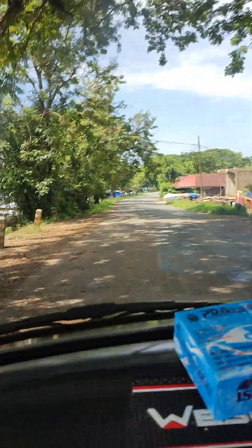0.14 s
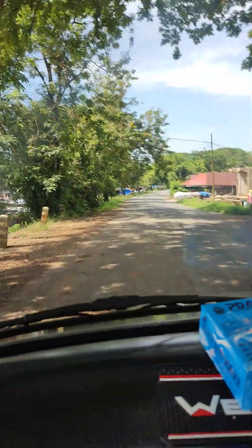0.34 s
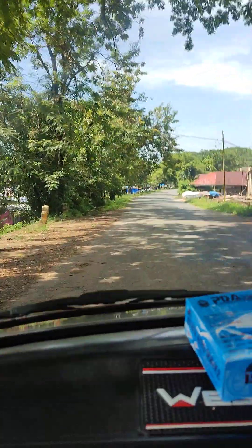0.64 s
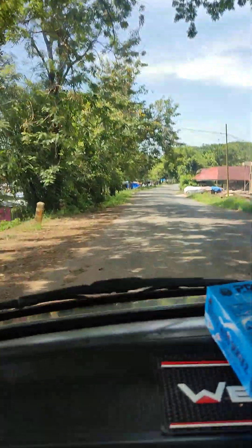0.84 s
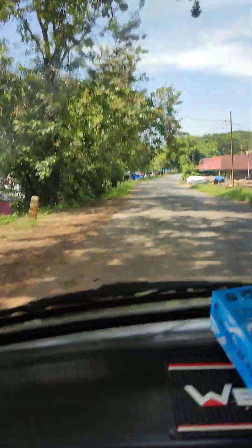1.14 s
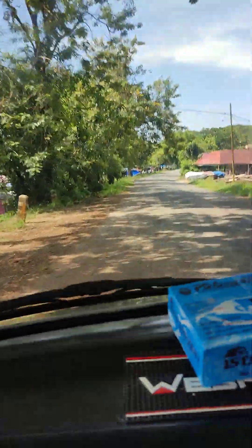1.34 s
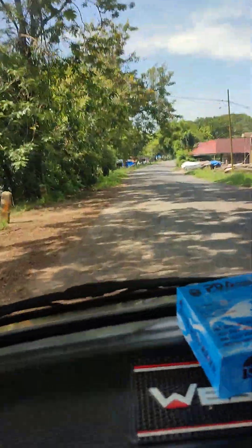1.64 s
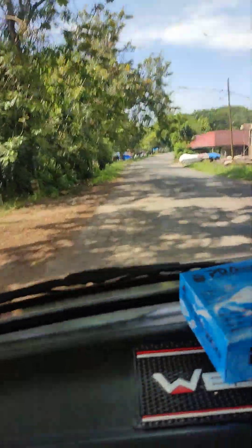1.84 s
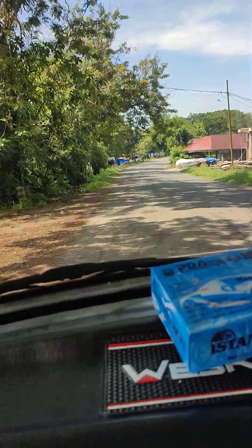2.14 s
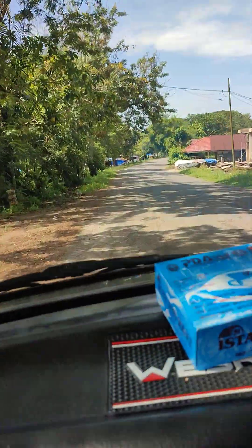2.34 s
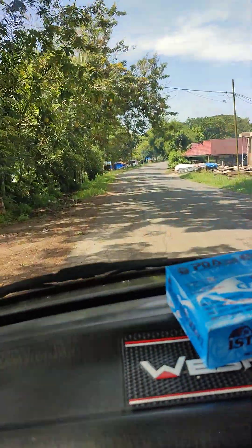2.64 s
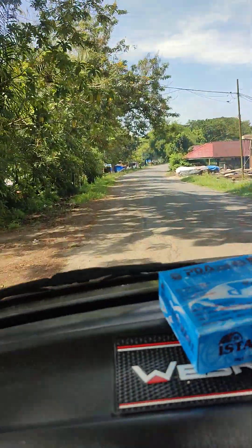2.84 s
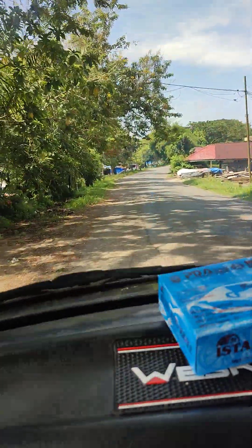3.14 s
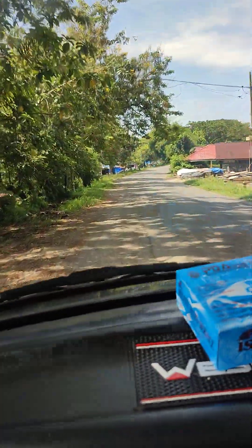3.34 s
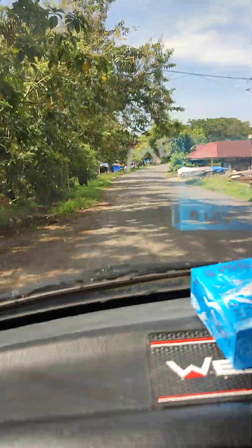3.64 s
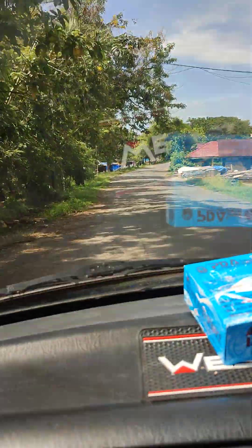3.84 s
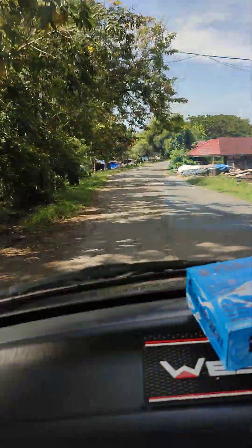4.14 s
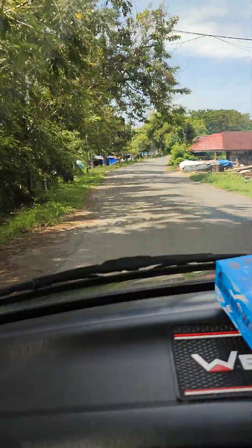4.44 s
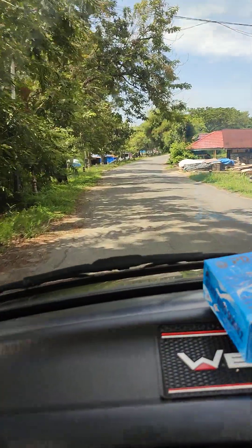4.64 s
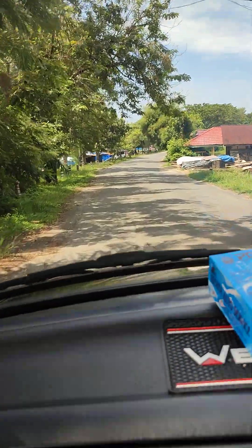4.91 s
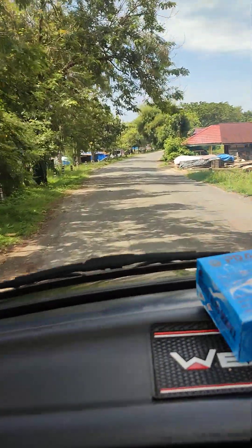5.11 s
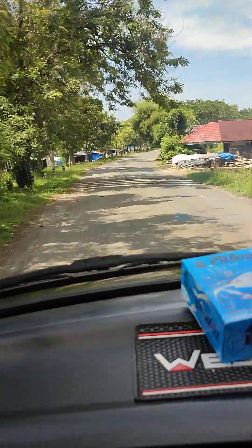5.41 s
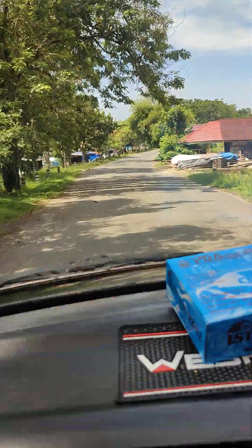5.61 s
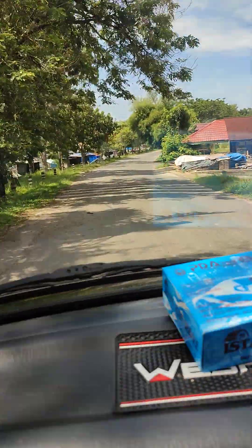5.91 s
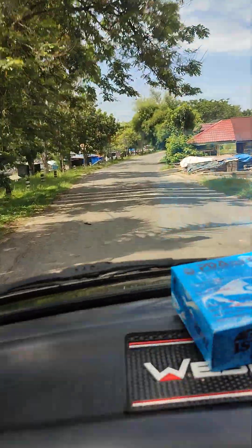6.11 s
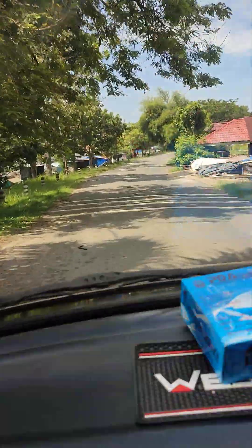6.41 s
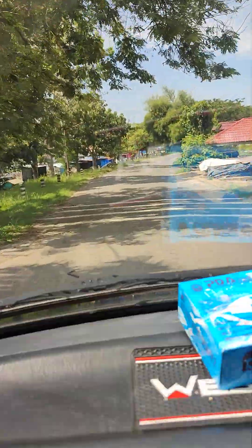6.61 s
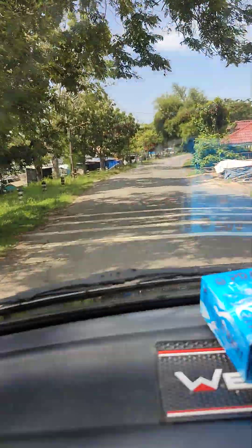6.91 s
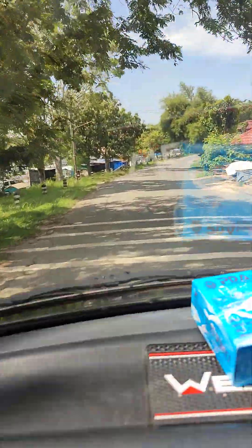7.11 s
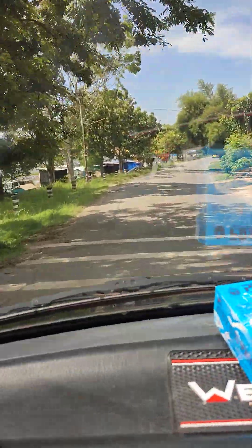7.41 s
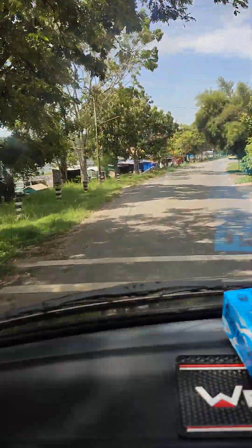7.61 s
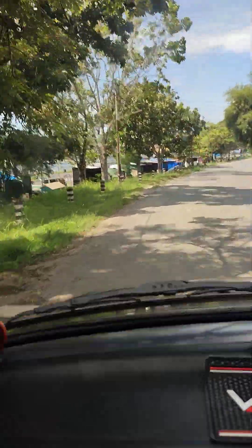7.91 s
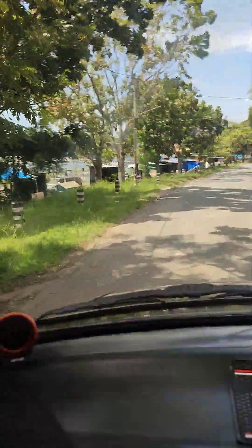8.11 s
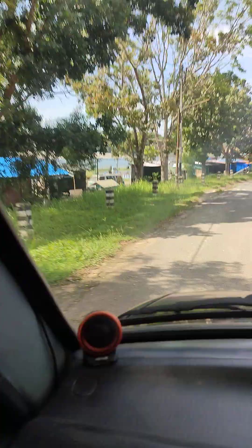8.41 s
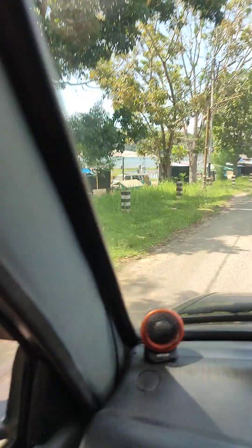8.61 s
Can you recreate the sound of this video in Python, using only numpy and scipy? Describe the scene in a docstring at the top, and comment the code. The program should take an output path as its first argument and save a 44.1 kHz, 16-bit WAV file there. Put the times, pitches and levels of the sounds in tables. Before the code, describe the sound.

Car cabin on a rough road: deep engine drone rising then steady, dull suspension bumps, trim clatter, faint quick wheel squeaks, closing jolts.

```python
"""An engine climbs through its multiples as a car gathers speed, heard at two ports inside the cabin.
It is a sum of sines locked to the firing rate; below it lie body shake, a drumming floor and tyre roar
made of shaped noise. A wheel squeaks as paired sines, trim clatters in noise bursts and blows ring the
panels. Narrow noise bands give far insects, a cicada, a whine and creaks; with some pure tone, a bird
and a squeal."""
import sys
import numpy as np
from scipy import signal
from scipy.fft import rfft, irfft
from scipy.io import wavfile
from scipy.ndimage import uniform_filter1d

SR = 44100
rng = np.random.default_rng(int(sys.argv[2]) if len(sys.argv) > 2 else 0)


def dump(signal):
    """Clip the signal to [-1, 1] and save it as 16-bit WAV at the path in sys.argv[1]."""
    limited = np.clip(np.atleast_2d(signal).T, -1, 1)
    pcm = np.round(limited * 32767).astype(np.int16)
    wavfile.write(sys.argv[1], SR, pcm)


N = 385862

# What the two ports share: [f/Hz, left-right likeness] and [f/Hz, left minus right level/dB]
LIKENESS = [(25, .9995), (60, .999), (130, .985), (280, .88), (620, .5), (1350, .35), (2900, .15)]
TILT = [(60, .4), (200, .8), (500, .5), (1200, -.6), (2300, -.2), (4200, -2.3), (8000, 2.4), (12000, 0)]
LEFT_LAG_S = 0.0002
EDGE_HZ = 14270  # upper band limit
# The microphones' own hiss: [f/Hz, relative density level/dB]
SELF_NOISE = [(7000, -11), (9500, -9), (14600, 9)]
SELF_NOISE_DB = -77

# Far insect chorus: [t/s, level/dB], before panning
CHORUS = [(0, -73.5), (1.1, -69.5), (1.58, -70), (1.83, -76), (2.5, -77), (3.46, -78.5), (5.04, -69),
          (8.75, -69)]
CHORUS_HZ, CHORUS_HZ_PER_S = 6960, -25.5
# Single sounds: (start t/s, rise t/s, hold t/s, fall t/s, peak level/dB, f/Hz), level before panning
CICADA = (5.85, .27, .4, 1.5, -70.5, 11450)
BIRD = (.98, .04, .075, .2, -65, 4000)
SQUEAL = (4.0, .045, .03, .065, -59, 8250)
CICADA_HZ_PER_S = -600
# Slur of the bird: [t/s from its start, f/Hz above its first pitch]
BIRD_ARCH = [(0, 0), (.055, 900), (.11, 970), (.165, 600), (.27, 520)]
# Faint creaks of the dashboard: [start t/s, rise t/s, hold t/s, fall t/s, peak level/dB, f/Hz]
CREAKS = [(2.93, .02, .03, .04, -61, 2420), (3.5, .03, .06, .05, -65, 3420),
          (3.6, 0.029, .04, .06, -63, 2590), (4.694, .03, .04, .04, -62, 2640),
          (4.849, .01, .02, .02, -59, 3190), (5.1, 0.047, 0.19, 0.11, -64, 2120),
          (5.32, .02, .03, .03, -66, 2630)]
QUIET_DB = -13  # where a swell starts and ends, relative to its peak
# Faint whine that comes and goes: [t/s, level/dB before trim and panning, f/Hz]
WHINE = [(0, -74, 1700), (.15, -64, 1710), (.35, -66, 1715), (.5, -62, 1720), (.6, -63, 1710),
         (.67, -63, 1760), (.78, -66, 1730), (1.2, -67, 1720), (1.35, -63, 1720), (1.46, -68, 1710),
         (1.54, -61, 1710), (1.68, -66, 1730), (1.8, -63, 1750), (1.96, -62, 1710), (2.07, -66, 1735),
         (2.3, -80, 1730)]
WHINE_TRIM_DB, WHINE_ROUGH_DB = -1.0, -64  # trim of the whine; noise around it

# Trim shaken by bumps: [t/s, 2-9 kHz level/dB, brightness in dB per octave, rise t/s, t60/s]
RATTLES = [(0.604, -50, -3, .006, 0.29), (.896, -52, -7, .004, 0.21), (1.317, -48, -4, 0.0022, .13),
           (1.565, -52, -2, .01, .3), (1.6, -50, -3, .006, .2), (1.643, -38, -8, .0006, .075),
           (1.652, -52, -2, 0.0082, 0.28), (2.238, -52, -6, .006, 0.11), (5.48, -56, 1, 0.0039, .12),
           (8.265, -53, -1, .02, 0.37), (8.425, -39, -7.5, 0.03, 0.24), (8.462, -58, 6, 0.014, 0.28),
           (8.621, -44, -5.5, 0.022, 0.33)]
RATTLE_PAN_DB = -0.5
# Wheel squeaks: [t/s, level/dB of the fundamental before panning, f/Hz]
SQUEAKS = [(.2224, -56, 4330), (.6194, -64, 4300), (1.0071, -55, 4320), (1.3867, -53, 4390),
           (1.7629, -55.5, 4360), (2.1256, -59, 4350), (2.4769, -56, 4350), (2.8165, -55.5, 4320),
           (3.129, -55.5, 4320), (3.4266, -58, 4380), (3.709, -56, 4330), (3.9722, -52.5, 4300),
           (4.2208, -54, 4260), (4.6927, -56.5, 4310), (4.9217, -56, 4310), (5.1345, -57.5, 4320),
           (5.3514, -57.5, 4290), (5.7753, -60, 4380), (5.9761, -63, 4420), (6.1904, -55, 4310),
           (6.3984, -64, 4320), (6.5944, -57, 4360), (6.8149, -57.5, 4300), (7.223, -55.5, 4340),
           (7.433, -58, 4365), (7.8461, -54.5, 4370)]
SQUEAK_S, SQUEAK_PAN_DB = 0.021, -5.5
SQUEAK_SAG, SQUEAK_SLIP = 0.026, 0.007  # share of the pitch lost over a squeak, and its unsteadiness
# The octave, relative to the fundamental at t = 0, fades as the car gathers speed
OCTAVE_LEFT_DB, OCTAVE_RIGHT_DB, OCTAVE_DB_PER_S = 4, -8, -1.6

# Dull blows from the suspension: [t/s, panel ring level/dB, thud ring level/dB, t60/s]
KNOCKS = [(0.316, -47.5, -28, 0.2), (.895, -47, -43, 0.13), (.921, -38, -40, .17), (1.071, -53, -43, 0.1),
          (1.6, -49, -22.5, 0.36), (1.643, -42, -31, 0.13), (1.668, -47, -26.5, 0.32),
          (1.712, -53.5, -32, 0.4), (1.744, -64, -30.5, 0.88), (8.44, -47, -34, 0.25),
          (8.524, -44, -27.5, 0.4), (8.623, -39, -41, 0.41)]
# Modes of the door panels, then of the floor under a blow: [f/Hz, relative level/dB, width/Hz]
PANEL_MODES = [(270, -7, 38), (410, 6, 52), (644, -10, 120), (800, -5, 90), (520, -16, 290)]
THUD_MODES = [(77, 3.5, 1.5), (116, -1.5, 20), (153, -20, 26), (199.8, -3.5, 6.5)]
BLOW_DB = 7  # peak of the first swing above the rms of the noise-driven ring

# Road noise over time: [t/s, shake of the body level/dB, boom of the floor pan level/dB]
BODY = [(0, -41, -31.5), (.24, -35, -42), (.36, -18, -31.5), (.56, -45, -38), (.72, -28.5, -39),
        (.8, -24, -37), (.94, -25.5, -34), (1.3, -32, -51), (1.4, -22, -29.5), (1.55, -31, -32),
        (1.74, -15, -32), (1.85, -50, -52), (2, -27, -48), (2.25, -33, -30), (2.55, -30, -46),
        (2.8, -39, -29), (3.6, -29, -30.5), (4.5, -23, -35), (4.6, -31, -25.5), (5, -27.5, -29),
        (5.4, -31.5, -31), (5.9, -25.5, -35), (6.05, -30.5, -29), (6.43, -24.5, -36.5), (7.45, -30, -41.5),
        (8.2, -20, -30.5), (8.55, -17, -26), (8.75, -19, -24)]
# [t/s, tyre roar level/dB, tyre hiss level/dB]
TYRES = [(0, -45, -53), (.7, -43, -52), (1.2, -41, -49), (1.35, -42, -52), (1.6, -39, -48), (1.7, -43, -48),
         (1.92, -42.5, -52.5), (2.3, -41.5, -52.5), (3.1, -39.5, -51), (4, -36, -49.5), (5, -37, -48.5),
         (6.1, -35.5, -49.5), (6.6, -37.5, -49), (7.2, -37.5, -48.5), (7.7, -37, -49), (8.1, -34.5, -47),
         (8.5, -31, -44.5), (8.75, -31.5, -44.5)]
# Spectra of shake, boom, roar, hiss and air rush: [f/Hz, relative density level/dB]
SHAKE = [(5, -41), (8, -1), (16, -7), (24, -4.5), (34, -8.5), (46, -8), (58, -14)]
BOOM = [(40, -12), (50, -0.5), (62, -3.5), (80, -7.5), (100, -17.5), (125, -26)]
ROAR = [(56, -27), (95, -1.5), (140, 4), (173, -2.5), (200, -0.5), (242, -7.5), (279, -6), (374, -13),
        (435, -14.5), (559, -22.5), (602, -14), (655, -23), (700, -24.5), (910, -57), (1540, -120)]
HISS = [(240, -14.5), (400, -9.5), (439, -1.5), (560, -6.5), (605, -17.5), (652, -10), (785, -6),
        (899, -6.5), (1010, -7), (1340, -11), (2120, -12), (2330, -17.5), (2620, -19.5), (2900, -25.5),
        (3900, -38), (6600, -120)]
RUSH = [(1290, -12.5), (2200, -4), (2810, -3), (3270, -3.5), (5440, -8), (7170, -8), (8830, -14),
        (9500, -19.5), (12400, -18), (14600, -22.5)]
LURCH_DB, LURCH_PER_S = 1.5, 5.0  # patches in the road make shake and boom lurch
RUSH_DB, RUSH_FOLLOWS, HISS_MEAN_DB = -57, 0.97, -49.5  # air rush rises with the hiss by this share
RUSH_EARLY_DB, RUSH_EARLY_S = 2.5, 2.07  # and is a little stronger until this time
# One drumming note of the floor pan: [t/s, f/Hz, level/dB]
DRUM = [(0, 53, -31), (.25, 53, -35), (.45, 53.5, -30.5), (.65, 53, -35), (.8, 53.3, -29), (1.0, 54, -35),
        (1.3, 54.5, -36), (1.43, 53.5, -23.5), (1.56, 53, -33), (1.72, 50.5, -26), (1.88, 50.7, -44),
        (2.0, 51.5, -33), (2.35, 51.5, -27.5), (2.55, 52, -35), (3.0, 53, -34), (3.35, 54, -33),
        (3.5, 53.5, -24), (3.68, 54, -26.5), (3.85, 54, -36), (4.3, 54, -40)]
DRUM_END_S = 4.3

# Engine: [t/s, firing rate f/Hz, firing tone level/dB, second multiple level/dB]
ENGINE = [(0, 26.08, -30.5, -45), (1.2, 27.0, -32, -45), (2, 28.0, -32, -46), (2.65, 31.05, -34.5, -40),
          (3, 33.3, -23, -34), (3.2, 34.8, -27, -33), (3.45, 36.8, -24, -28), (3.7, 38.8, -21, -29.5),
          (4.07, 41.9, -24, -29), (4.17, 42.8, -24, -42), (4.33, 43.9, -23.5, -25.5),
          (4.52, 45, -25, -26.5), (4.62, 45.8, -25, -44), (4.75, 46.7, -25, -36), (5, 47.87, -28.5, -37),
          (5.28, 48.88, -23, -41), (5.43, 49.5, -41, -48), (5.55, 49.9, -25.5, -40),
          (5.86, 50.5, -19.5, -55), (5.99, 50.6, -30, -50), (6.07, 50.7, -21.5, -47),
          (6.55, 51, -25.5, -50), (6.83, 51, -19.5, -50), (6.92, 50.8, -26.5, -50),
          (7.27, 50.8, -22.5, -52), (7.37, 50.7, -31, -52), (7.45, 50.7, -24.5, -52),
          (7.78, 50.7, -26, -52), (7.92, 50.7, -19, -48), (8.02, 50.7, -23.5, -46),
          (8.35, 50.7, -18.5, -46), (8.45, 50.8, -26, -46), (8.54, 51, -17, -44), (8.64, 51.6, -26, -44),
          (8.75, 52.2, -29, -44)]
# Further multiples: [multiple of the firing rate, relative level/dB]
HIGHER = [(1.5, -6), (3, -7), (4, -7.5), (5, -12.5), (6, -12.5), (12, -30)]
# Air modes of the cabin: [f/Hz, gain level/dB]
CABIN = [(20, -20), (100, -4.5), (132, 0.5), (150, -1.5), (175, -8), (208, 2), (240, -9), (290, -6.5),
         (600, -14)]
CRUISE_DB, PULL_DB_PER_HZ_S = -43, 1.05  # base of these multiples, and dB for each Hz/s of climb


def amp(db):
    """Definition of level: dB to amplitude gain."""
    return 10 ** (np.asarray(db) / 20)


def evened(x):
    """Normalisation of power: scaled to rms 1."""
    return x / np.sqrt(np.mean(x ** 2) + 1e-20)


def read(points, hz):
    """Logarithmic interpolation: a table over frequency, joined on a log axis."""
    f, value = np.transpose(points)
    return np.interp(np.log(hz + 1), np.log(f + 1), value)


def curves(rows):
    """Linear interpolation: the columns of a table at every sample."""
    s, *columns = np.transpose(rows)
    return [np.interp(np.arange(N) / SR, s, column) for column in columns]


def wander(per_s):
    """Low-pass filtering of white noise: slow chance of rms 1, with its cutoff in Hz."""
    return evened(signal.lfilter(*signal.butter(2, per_s, fs=SR), rng.standard_normal(N)))


def panned(x, db):
    """Interaural level difference: left louder than right by db."""
    return x * amp(np.array([[db / 2], [-db / 2]]))


def lagged(x):
    """Interaural time difference: a low tone reaches the left port slightly late."""
    return panned(np.array([np.roll(x, round(LEFT_LAG_S * SR)), x]), db=0.55)


def add(mix, s, sound):
    """Superposition: mixes a sound in at time s."""
    part = mix[:, round(s * SR):][:, :sound.shape[1]]
    part += sound[:, :part.shape[1]]


def swell(start, rise, hold, fall, db):
    """Amplitude envelope: gain rises from quiet to db, holds and falls back."""
    t, end = np.arange(N) / SR, start + rise + hold + fall
    level_db = np.interp(t, [start, start + rise, end - fall, end], [QUIET_DB, 0, 0, QUIET_DB])
    soft_ends = np.clip(np.minimum(t - start, end - t) / 0.02, 0, 1)
    return amp(db + level_db) * soft_ends


def noise(spectrum, size, patchy_db, flicker_db, streak_db=0.47):
    """Partial coherence: random spectra in drifting patches, as two ports hear a spread-out source."""
    frames, hz = 4 * N // size + 5, np.fft.rfftfreq(size, 1 / SR)
    a, b, c, d, patches, streaks = rng.standard_normal((frames, len(hz), 6)).T
    # Narrow cabin resonances that come and go
    streaks = evened(uniform_filter1d(streaks, size=frames // 10, axis=1, mode="wrap"))
    patches = uniform_filter1d(patches, size=8, axis=0)
    patches = evened(uniform_filter1d(patches, size=6, axis=1))
    flicker = evened(uniform_filter1d(rng.standard_normal(frames), size=3))

    same = np.clip(read(LIKENESS, hz), 0, 1)[:, None]
    left = a + 1j * b
    ahead = np.exp(2j * np.pi * hz * LEFT_LAG_S)[:, None]
    right = ahead * (same * left + np.sqrt(1 - same ** 2) * (c + 1j * d))
    tilt = amp(read(TILT, hz) / 2)[:, None]

    inside = (hz >= spectrum[0][0]) & (hz <= spectrum[-1][0])
    level_db = read(spectrum, hz)[:, None] + patchy_db * patches
    level_db = level_db + streak_db * streaks + flicker_db * flicker
    z = np.array([left * tilt, right / tilt]) * inside[:, None] * amp(level_db)
    return evened(signal.istft(z, nperseg=size, noverlap=3 * size // 4)[1][:, :N])


def band(hz, width_hz, steady=0.):
    """Frequency shifting of low-pass noise, unrelated at the ports; steady is the share of pure tone."""
    z = rng.standard_normal((2, N)) + 1j * rng.standard_normal((2, N))
    z = signal.lfilter(*signal.butter(2, width_hz / 2, fs=SR), z)
    z = z / np.sqrt(np.mean(abs(z) ** 2))
    pure = np.exp(1j * np.array([[0], [1.3]]))  # a fixed phase between the ports
    z = steady * pure + (1 - steady) * z
    carrier = np.exp(2j * np.pi * np.cumsum(hz) / SR)
    return evened((z * carrier).real)


def tone(sound, blur_hz, pan_db, steady, bend=((0, 0),)):
    """Narrow-band modulation: a thin tone blurred by a width, its pitch bent by a small table."""
    hz = sound[5] + np.interp(np.arange(N) / SR - sound[0], *np.transpose(bend))
    return panned(swell(*sound[:5]) * band(hz, blur_hz, steady), pan_db)


def insects():
    """Incoherent summation: a far chorus is one smooth band; a cicada sinks as the car passes."""
    t = np.arange(N) / SR
    chorus_gain = amp(curves(CHORUS)[0] + 0.5 * wander(per_s=20.0))
    chorus = chorus_gain * band(CHORUS_HZ + CHORUS_HZ_PER_S * t, width_hz=1200)
    cicada_hz = CICADA[5] + CICADA_HZ_PER_S * (t - CICADA[0])
    cicada_gain = swell(*CICADA[:5]) * amp(1.0 * wander(per_s=40.0))
    return panned(chorus, db=-17.5) + cicada_gain * band(cicada_hz, width_hz=950)


def bird():
    """Frequency modulation: one nearly pure note slurs up and part of the way back."""
    flutter = amp(1.2 * wander(per_s=28.0))
    return flutter * tone(BIRD, blur_hz=60, pan_db=3.0, steady=0.72, bend=BIRD_ARCH)


def squeal():
    """Narrow bandwidth gives definite pitch: one brief, thin high squeal."""
    return tone(SQUEAL, blur_hz=10, pan_db=3.0, steady=0.8)


def creaks():
    """Random amplitude within a narrow band: each faint dashboard creak is a blurred pitch."""
    return sum(tone(creak, blur_hz=150, pan_db=0., steady=0.) for creak in CREAKS)


def whine():
    """Tone in noise: a narrow, fluttering band within rough noise, louder at the left port."""
    db, hz = curves(WHINE)
    rough = amp(WHINE_ROUGH_DB) * band(hz, width_hz=400)
    rough = rough * np.clip(2.2 - np.arange(N) / SR, 0, 0.3) / 0.3  # gone by 2.2 s
    gain = amp(db + WHINE_TRIM_DB + 2.0 * wander(per_s=15.0))
    return panned(gain * band(hz, width_hz=35, steady=0.45) + rough, db=9.0)


def trim():
    """Impact excitation: each bump shakes loose a short burst of tiny clatter."""
    out, t = np.zeros((2, N)), np.arange(8192) / SR
    hz = np.fft.rfftfreq(8192, 1 / SR)
    for s, db, bright_db, rise_s, t60 in RATTLES:
        grain_gain = amp(0.92 * rng.standard_normal(8192 // 64).repeat(64))
        grains = rng.standard_normal((2, 8192)) * grain_gain
        colour = amp(bright_db * np.log2(hz / 1000 + 0.054)) * hz ** 2 / (hz ** 2 + 900 ** 2)
        colour = colour * amp(np.interp(hz, [8000, 9600], [0, -7.0]))  # the ports dull the top
        colour = colour / np.sqrt(np.mean(colour ** 2 * (hz > 2000) * (hz < 9000)))
        burst = irfft(rfft(grains) * colour)
        attack = np.sin(np.pi / 2 * np.minimum(t / rise_s, 1)) ** 2
        add(out, s, panned(amp(db) * burst * attack * amp(-60 * t / t60), RATTLE_PAN_DB))
    return out


def wheel():
    """Friction-driven oscillation: a rubbing spot squeaks briefly with its octave, sagging a little."""
    out, t = np.zeros((2, N)), np.arange(round(SQUEAK_S * SR)) / SR
    shape = signal.windows.tukey(len(t), 0.7)
    for s, db, hz in SQUEAKS:
        unsteady = evened(uniform_filter1d(rng.standard_normal(len(t)), size=90))
        bend = 1 + SQUEAK_SAG * (0.5 - t / SQUEAK_S) + SQUEAK_SLIP * unsteady
        turn = 2 * np.pi * hz * np.cumsum(bend) / SR
        fade_db = OCTAVE_DB_PER_S * s
        left = np.sin(turn) + amp(OCTAVE_LEFT_DB + fade_db) * np.sin(2 * turn)
        right = np.sin(turn + 1.5) + amp(OCTAVE_RIGHT_DB + fade_db) * np.sin(2 * turn + 2.1)
        squeak = amp(db + 1.7 * unsteady) * shape * np.array([left, right])
        add(out, s - 0.003, panned(squeak, SQUEAK_PAN_DB))
    return out


def ring(modes, apart):
    """Modal superposition: modes swing out together, then noise partly unrelated at the ports rings on."""
    f, t = np.fft.rfftfreq(8192, 1 / SR), np.arange(8192) / SR
    colour = sum(amp(db) / (1 + ((f - hz) / width) ** 2) for hz, db, width in modes)
    shared, own = rng.standard_normal(8192), rng.standard_normal((2, 8192))
    swing = np.zeros(8192)
    for hz, db, width in modes:
        swing_hz = hz * rng.uniform(0.81, 1.05)
        swing -= amp(db) * np.sin(2 * np.pi * swing_hz * t) * np.exp(-np.pi * width * t)
    ringing = evened(irfft(rfft(shared + apart * own) * colour))
    return ringing + amp(BLOW_DB) * swing / np.abs(swing).max()


def knocks():
    """Impulse response: a blow sets the floor and the door panels ringing for a moment."""
    out, t = np.zeros((2, N)), np.arange(8192) / SR
    for s, panel_db, thud_db, t60 in KNOCKS:
        panels = amp(panel_db) * ring(PANEL_MODES, apart=1.0)
        thud = amp(thud_db) * ring(THUD_MODES, apart=0.097)
        envelope = amp(-60 * t / t60) * (1 - np.exp(-t / 0.0006))
        add(out, s, (panels + thud) * envelope)
    return out


def road():
    """Random excitation: body shake and boom, tyre roar and hiss, and air rushing past the windows."""
    shake_db, boom_db = curves(BODY)
    roar_db, hiss_db = curves(TYRES)
    early = np.clip((RUSH_EARLY_S - np.arange(N) / SR) / 0.23, 0, 1)
    rush_db = RUSH_DB + RUSH_FOLLOWS * (hiss_db - HISS_MEAN_DB) + RUSH_EARLY_DB * early
    shake_db = shake_db + LURCH_DB * wander(LURCH_PER_S)
    boom_db = boom_db + LURCH_DB * wander(LURCH_PER_S)
    return (amp(shake_db) * noise(SHAKE, size=8192, patchy_db=-0.5, flicker_db=0.5)
            + amp(boom_db) * noise(BOOM, size=8192, patchy_db=-0.5, flicker_db=1.6)
            + amp(roar_db) * noise(ROAR, size=4096, patchy_db=0.65, flicker_db=-0.92)
            + amp(hiss_db) * noise(HISS, size=2048, patchy_db=0.94, flicker_db=1.0, streak_db=2.0)
            + amp(rush_db) * noise(RUSH, size=1024, patchy_db=1.33, flicker_db=0.5, streak_db=1.5))


def drum():
    """Forced resonance: the road keeps one low floor mode going while the firing tone climbs towards it."""
    hz, db = curves(DRUM)
    turn = 2 * np.pi * np.cumsum(hz) / SR + 2 * np.pi * rng.random()
    x = np.sqrt(2) * amp(db + 1.0 * wander(per_s=17.0)) * np.sin(turn)
    fade = np.clip((DRUM_END_S - np.arange(N) / SR) / 0.35, 0, 1)
    return lagged(x * fade)


def engine():
    """Harmonic series: uneven burning wavers the multiples of the firing rate; cabin air lifts some."""
    hz, first_db, second_db = curves(ENGINE)
    climb_hz_per_s = uniform_filter1d(np.gradient(hz) * SR, size=SR // 2)
    higher_db = CRUISE_DB + PULL_DB_PER_HZ_S * climb_hz_per_s
    hz = hz * (1 + 0.0027 * wander(per_s=4.1))
    turn = 2 * np.pi * np.cumsum(hz) / SR

    def multiple(k, level_db):
        """Phase locking: one multiple keeps its ratio to the firing tone from a random start."""
        return amp(level_db) * np.sin(k * turn + 2 * np.pi * rng.random())

    x = multiple(1, first_db + 0.75 * wander(per_s=13.0))
    x = x + multiple(2, second_db + 1.5 * wander(per_s=6.0))
    for k, db in HIGHER:
        x = x + multiple(k, higher_db + db + read(CABIN, k * hz) + 3.5 * wander(per_s=5.0))
    return lagged(np.sqrt(2) * x)  # the levels are rms


def scene():
    """Superposition of pressures: everything that reaches the two ports."""
    background = insects() + bird() + squeal() + creaks() + whine()
    return background + trim() + wheel() + knocks() + road() + drum() + engine()


def record(dry):
    """Transducer noise and bandwidth: the microphones add their own hiss; then soft ends, band limit."""
    wet = dry + amp(SELF_NOISE_DB) * noise(SELF_NOISE, size=512, patchy_db=2.0, flicker_db=7.0)
    wet = wet * signal.windows.tukey(N, 0.0005)
    low_pass = signal.firwin(1023, EDGE_HZ, window=("kaiser", 10), fs=SR)
    return signal.oaconvolve(wet, low_pass[None], "same")


dry = scene()
out = record(dry)
dump(out)
```